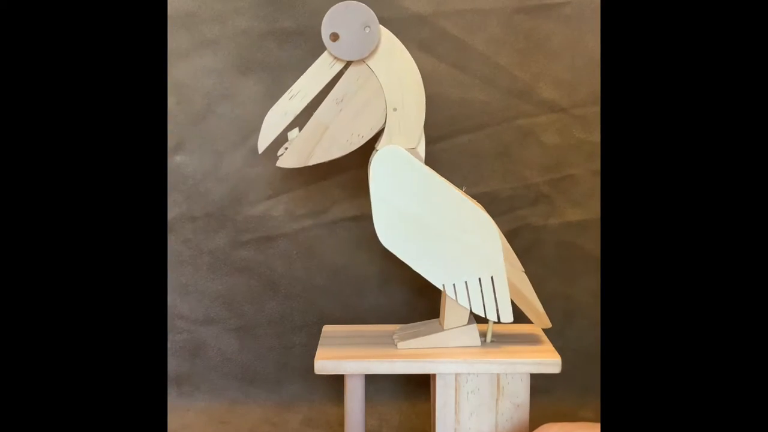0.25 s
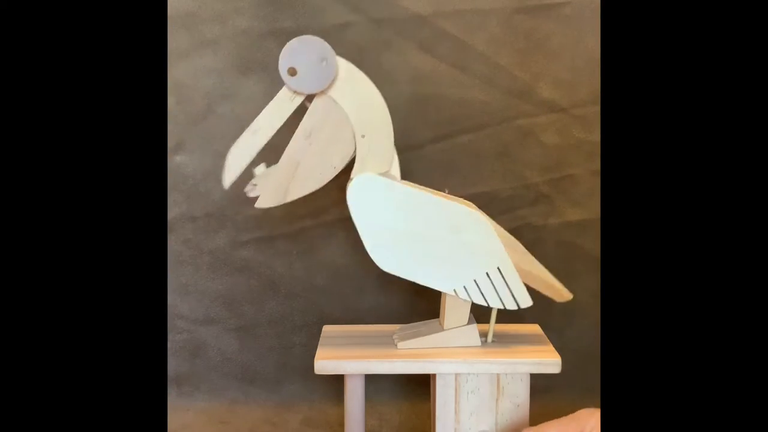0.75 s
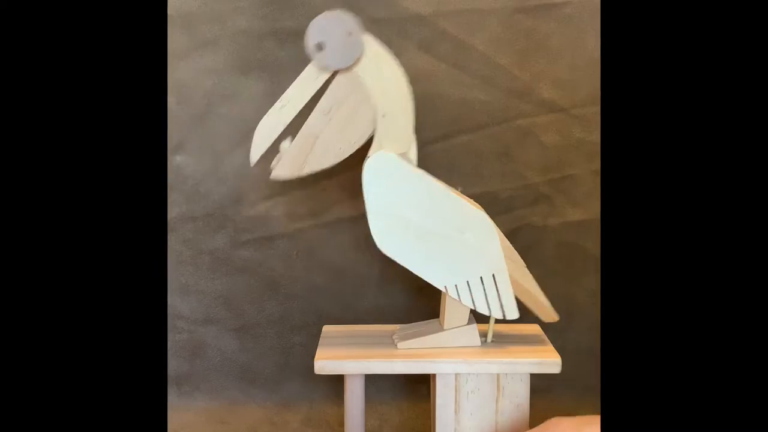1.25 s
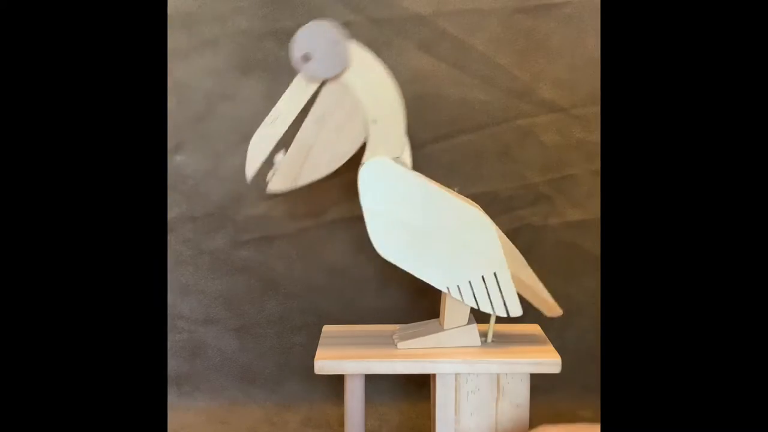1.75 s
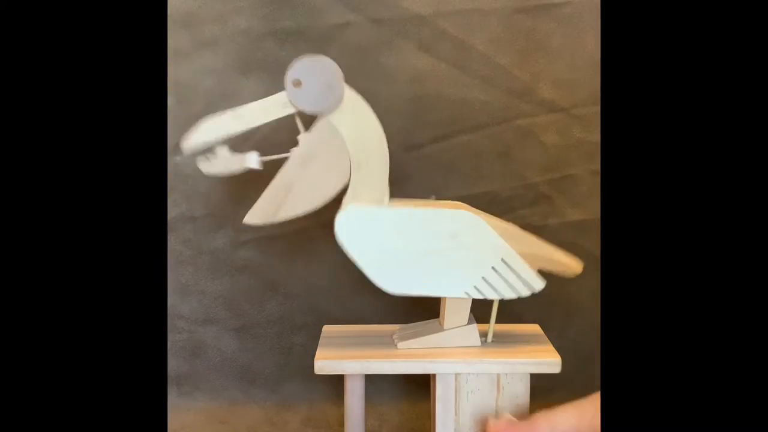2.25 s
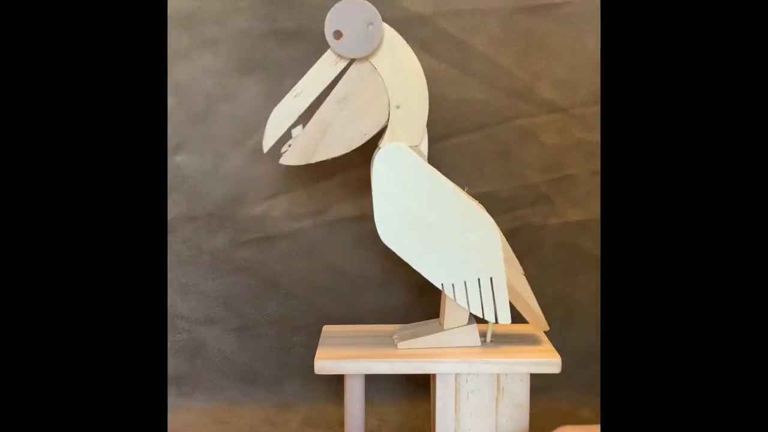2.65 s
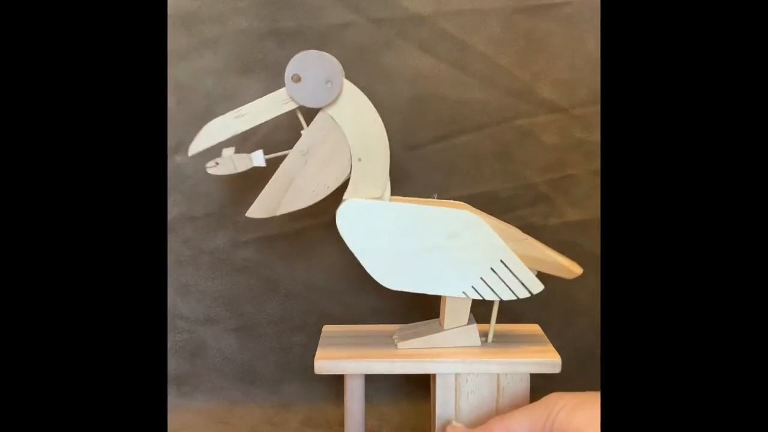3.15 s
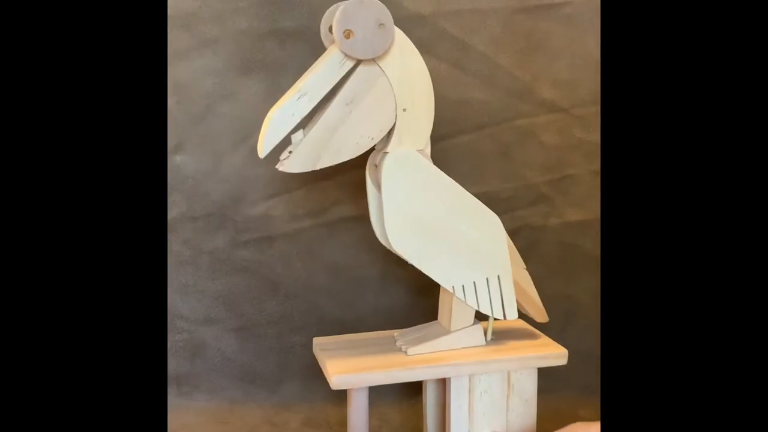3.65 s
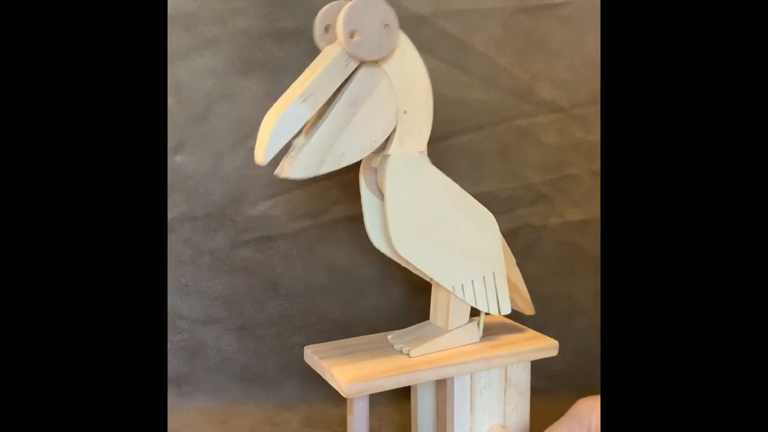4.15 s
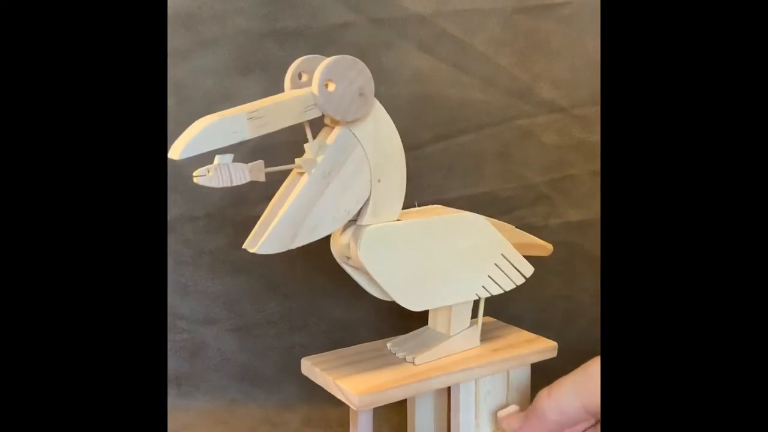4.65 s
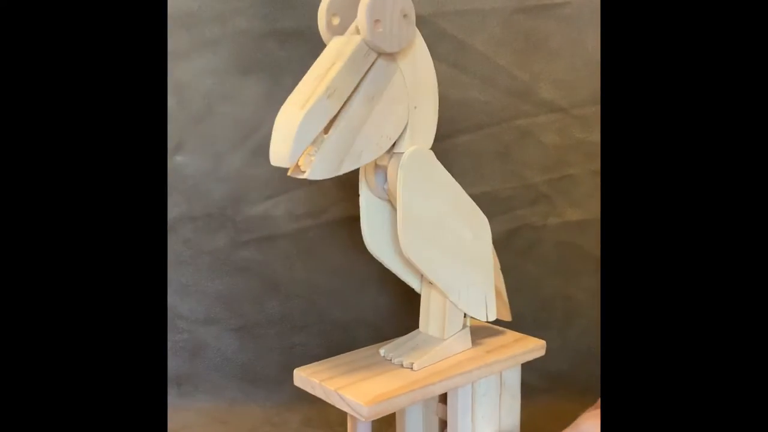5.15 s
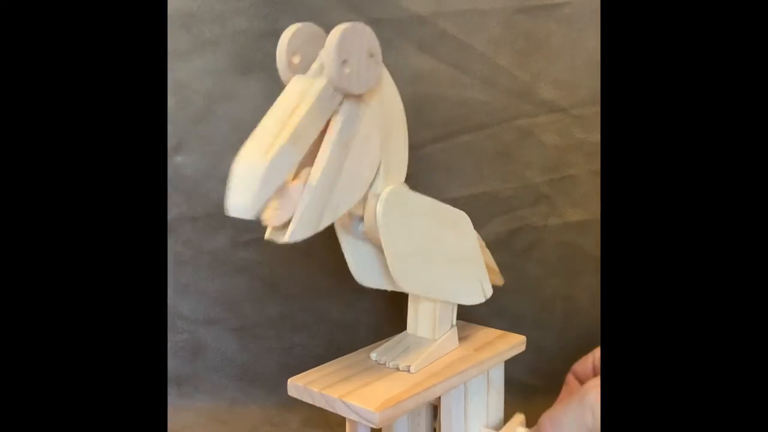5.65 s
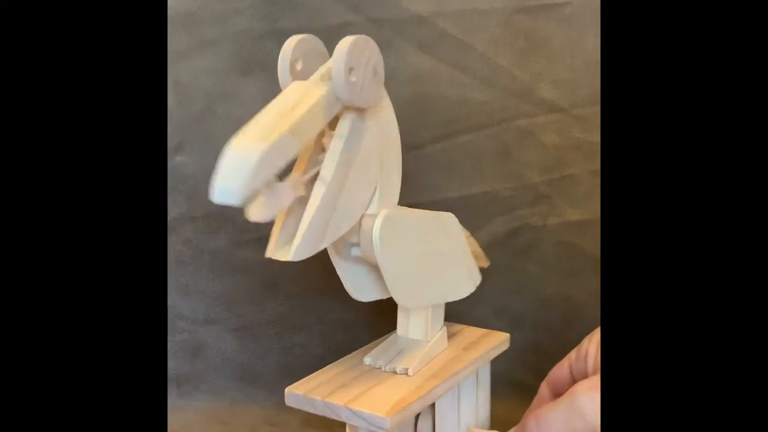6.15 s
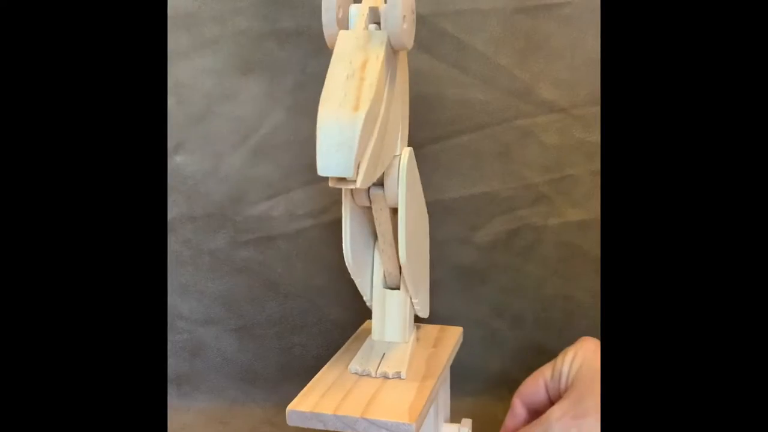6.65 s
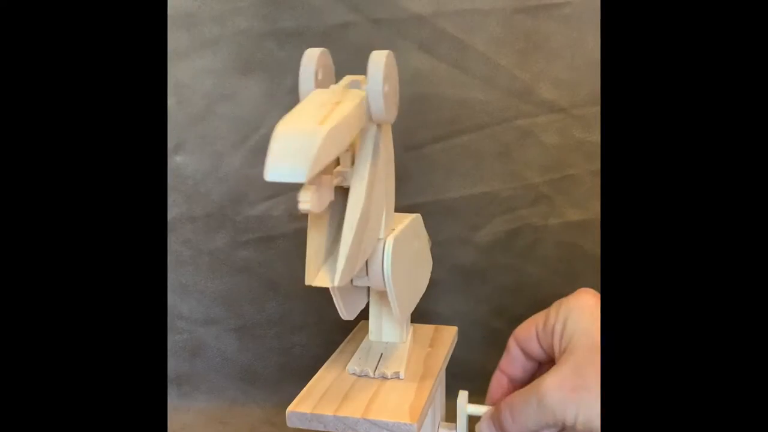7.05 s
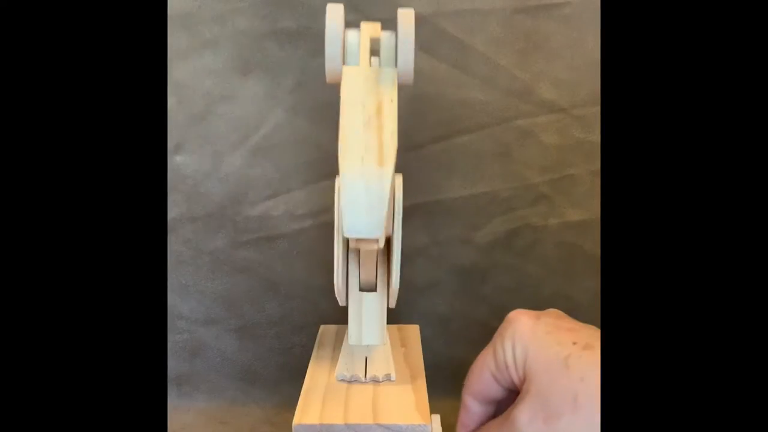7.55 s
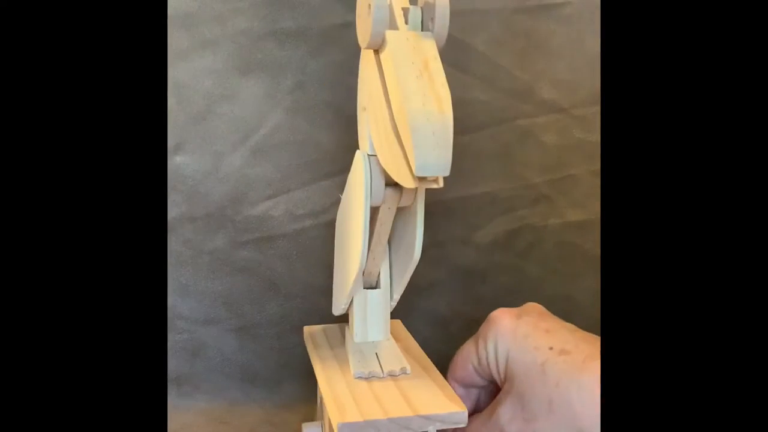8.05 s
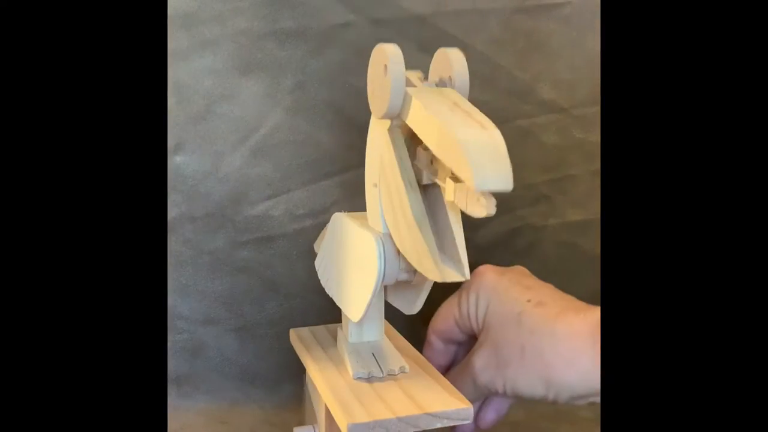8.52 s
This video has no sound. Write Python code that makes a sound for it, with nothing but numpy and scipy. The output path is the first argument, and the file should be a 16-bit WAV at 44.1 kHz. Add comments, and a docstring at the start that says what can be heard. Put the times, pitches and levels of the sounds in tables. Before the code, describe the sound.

A hand-cranked wooden toy bird clacks, knocks and creaks in uneven bursts, its beak snapping, close by in a small quiet room.

```python
"""A hand-cranked wooden pelican bows, snaps its beak and rears up again, close by in a small quiet room.
In still air the dry axle first ticks by stick-slip, and friction noise swells with each push of the crank.
From half a second on, a link rasps along its guide, then beak, wings and linkage clack as damped noise bursts
and followers knock on the hollow stand, whose modes ring on; loose parts rattle and a thin slat sings.
A second in, the beak starts to snap shut; from two seconds links also hit their stops. Short echoes follow."""
import sys
import numpy as np
from scipy import signal
from scipy.fft import rfft, irfft, next_fast_len
from scipy.io import wavfile
from scipy.ndimage import map_coordinates

SR = 44100
rng = np.random.default_rng(int(sys.argv[2]) if len(sys.argv) > 2 else 0)


def transcribe(u):
    """Save the signal u as a 16-bit wav file named by the first command-line argument.

    u: samples, shape (n,) or (channels, n), limited to [-1, 1]; the rate is SR.
    q: integer samples, one column per channel.
    """
    v = np.clip(np.atleast_2d(u).T, -1, 1)
    q = np.round(v * 32767).astype(np.int16)
    wavfile.write(sys.argv[1], SR, q)


N = 387198  # length in samples

# still air of the room: frequency_hz, relative_db
AIR_COLOUR = [(20, -5.5), (45, 3), (90, -3), (150, -7), (260, -4.5), (420, -17), (620, -17), (1050, -18.5),
              (1800, -33.5), (3000, -39), (4200, -42.5), (8000, -43), (16000, -37.5)]

# stick-slip runs of the dry axle: first_slip_s, last_slip_s (unused for a single slip), count, strength_db
SLIP_RUNS = [(.089, 0.12, 3, -66.5), (0.182, .25, 4, -64.5), (.28, 0.38, 3, -59.5), (.379, 0.5, 5, -60.5),
             (1.244, 1.244, 1, -53), (1.731, 1.797, 3, -57.5), (1.809, 1.873, 6, -59),
             (1.918, 1.918, 1, -53), (2.546, 2.594, 2, -52.5), (3.004, 2.8, 1, -60.5),
             (3.667, 3.816, 4, -56.5), (3.856, 3.993, 8, -58.5), (5.018, 5.052, 3, -55.5),
             (5.328, 3.5, 1, -52.5), (6.371, 6.371, 1, -55), (6.649, 6.1, 1, -59.5), (7.572, 7.3, 1, -58),
             (7.935, 8.045, 4, -58)]
# resonances of the axle: frequency_hz, width_hz, gain_db
AXLE_MODES = [(1290, 54, 3), (3000, 420, -9.5), (3860, 210, 3.5), (4400, 170, -3.5), (7410, 600, -38),
              (12100, 740, -2.5), (15260, 700, -4)]
# scatter of the slips, in time (greatest in the middle of a run) and in strength
SLIP_SCATTER_S, SLIP_SCATTER_DB = 0.0052, 0.4

# reverberation of the room: frequency_hz, t60_s
ROOM_DECAY = [(100, 0.85), (400, 0.61), (1500, 0.58), (4000, 0.74), (8000, 0.6), (15000, 1.7)]
# strength of the room's answer: frequency_hz, level_db
ROOM_LEVEL = [(100, 0.5), (400, -4.5), (1500, -3), (4000, -6.5), (8000, -5), (15000, -14)]

# pushes of the hand on the crank: start_s (half risen), end_s, axle_hiss_db, sliding_load_db
PUSHES = [(0.107, 0.517, -86, -70.5), (0.507, 0.828, -64, -51), (0.96, 1.072, -66.5, -50),
          (1.262, 1.73, -67.5, -51.5), (2.038, 2.456, -64, -49), (2.545, 3.05, -69.5, -61),
          (3.147, 3.38, -69, -84), (3.34, 3.497, -69.5, -57), (3.533, 4.008, -66.5, -66),
          (4.097, 4.293, -67.5, -58), (4.298, 4.423, -73.5, -70), (4.597, 4.738, -70.5, -60),
          (4.745, 5.07, -70, -56), (5.453, 5.896, -73, -58.5), (5.97, 6.5, -67, -64.5),
          (6.644, 6.783, -63.5, -44.5), (6.819, 7.015, -69, -53.5), (7.184, 7.375, -66, -68),
          (7.405, 7.79, -68, -73), (7.42, 7.571, -88, -55), (8.09, 8.443, -69, -55.5),
          (8.593, 8.67, -67, -52.5)]
# a push builds up, wavers and dies away
PUSH_RISE_S, PUSH_T60_S, PUSH_WAVER_DB = 0.045, 0.33, -0.2
# colour of the axle's friction hiss: frequency_hz, relative_db
HISS_COLOUR = [(1500, -32), (3200, -13), (4300, 6), (5200, -5), (6200, -4), (7400, -5.5), (8600, -11.5),
               (10500, -7.5), (12300, -2.5), (13800, -2.5), (14700, -5.5), (15500, -1.5), (16400, -7.5)]
# scrape of the thin parts against the load and against the hiss
SCRAPE_LOAD_DB, SCRAPE_HISS_DB = -10.5, -11

# strokes of a link along its guide, gathering speed: start_s, end_s, end_level_db
STROKES = [(0.496, 0.525, -52.5), (0.91, 1.05, -59), (1.23, 1.36, -56), (1.92, 1.97, -59),
           (2.14, 2.266, -51), (3.33, 3.4, -62), (4.7, 4.837, -71), (3.99, 4.08, -49.5),
           (6.637, 6.653, -51.5), (6.667, 6.785, -52), (6.957, 7.011, -53.5), (8.1, 8.158, -55.5)]

# clatter of beak, wings and links as the bird pitches forward:
# time_s, strength_db, hardness_db (snap over clack), favoured_hz
CLACKS = [(0.5274, -46, -16, 1950), (0.5547, -40.5, -17, 3460), (.599, -44, -18.5, 1770),
          (.682, -40.5, -10.5, 3350), (0.77, -48, -8.5, 1430), (.7895, -44, -9.5, 4100),
          (.7972, -44, -10.5, 1780), (1.198, -59, -15, 1956), (1.3215, -44.5, -23.5, 3500),
          (1.3632, -45.5, -22.5, 1767), (1.3938, -38.5, 0, 5340), (1.425, -24.5, -10, 3500),
          (1.427, -33, -10.5, 1800), (1.4962, -48.5, -11, 1000), (1.9754, -34, -16, 1860),
          (1.9972, -37, -12.5, 2107), (2.2153, -49, -12, 2000), (2.2264, -43.5, 0.5, 5700),
          (2.282, -53.5, -40.5, 1560), (2.6769, -40.5, -19, 1780), (2.681, -35, 1, 2700),
          (2.7479, -44, -16.5, 2600), (2.7783, -39.5, -9, 1880), (2.8224, -33.5, -21.5, 3630),
          (2.8407, -41.5, -21.5, 1860), (4.0678, -33, 1, 2900), (4.0829, -43.5, -10, 1550),
          (4.0954, -35, -11.5, 1860), (4.2647, -50.5, -30, 2940), (4.277, -57, -21, 3520),
          (4.3315, -38.5, -26, 3900), (4.4092, -55, -29.5, 2850), (4.425, -54.5, -24, 3500),
          (4.458, -62.5, -20, 1300), (5.3946, -51, -9.5, 4460), (5.4126, -27, -0.5, 5100),
          (5.507, -38, -6, 7460), (5.5348, -43.5, -8.5, 2653), (5.5816, -37.5, -6, 7440),
          (5.6544, -35.5, -17, 3700), (5.7808, -55, -11, 2100), (5.8718, -56, -12, 4060),
          (6.6645, -57.5, -4, 994), (6.724, -60, -5, 1010), (6.758, -59.5, -1, 3500),
          (6.773, -51.5, -26, 1350), (6.865, -63.5, -16, 2020), (7.5368, -59.5, -15, 1010),
          (8.1604, -31.5, -8, 7050), (8.184, -36, -11.5, 1930), (8.241, -48, -8.5, 2980),
          (8.2609, -37, -5.5, 7300), (8.6342, -60, -6, 2700)]
# limits of the wood body, clack and snap bands: edge_hz
CLACK_EDGES = [520, 2300, 6000, 16000]
# resonances of beak, wings and links: frequency_hz, width_hz, gain_db
PART_MODES = [(670, 57, 0), (1020, 120, 4), (1367, 81, 9), (1485, 18, 9), (2089, 160, 3.5),
              (2580, 400, 0.5), (3696, 470, 2.5), (4335, 350, 1.5), (5414, 290, -2.5), (5940, 220, -2.5),
              (6130, 150, -13.5), (7426, 130, 1.5), (9760, 420, -11.5), (11920, 550, -9),
              (15300, 1200, -10)]
# wood body over clack strength: dB when SPOT_HZ is favoured, and dB lost for each octave higher
BODY_DB, BODY_DB_PER_OCTAVE, SPOT_HZ = 2.5, 5, 2500
# harder contacts have less body: dB lost for each dB of hardness above the usual
BODY_DB_PER_HARDNESS, USUAL_HARDNESS_DB = 0.18, -15.5

# drops of the followers on the cam: time_s, strength_db, favoured_hz
KNOCKS = [(0.5585, -45, 235), (0.5768, -37.5, 367), (0.602, -42.5, 223), (0.7581, -39.5, 247),
          (0.7683, -39.5, 370), (1.2125, -50.5, 232), (1.3736, -45, 224), (1.424, -26.5, 684),
          (1.7422, -48.5, 258), (2.214, -48, 410), (2.2797, -45.5, 436), (2.4441, -38, 226),
          (2.7512, -35.5, 203), (2.8006, -37.5, 500), (2.8218, -34, 222), (3.1185, -43.5, 172),
          (3.4381, -51, 400), (3.476, -50, 264), (3.8662, -49.5, 164), (4.0727, -40, 236),
          (4.0946, -44.5, 358), (4.1635, -42.5, 255), (4.9363, -50.5, 393), (5.0515, -52.5, 188),
          (5.48, -34, 407), (5.511, -44.5, 240), (5.6022, -46, 212), (5.652, -35, 614),
          (6.6587, -48.5, 199), (6.7292, -39.5, 190), (6.758, -38, 168), (6.7688, -39.5, 352),
          (6.8463, -47.5, 170), (7.5301, -45, 320), (8.1625, -40, 660), (8.192, -43, 223),
          (8.242, -38.5, 215), (8.2655, -55, 228), (8.668, -48, 600)]
# limits of the thud and knock bands: edge_hz
KNOCK_EDGES = [58, 300, 1500]
# resonances of the hollow stand: frequency_hz, width_hz, gain_db
STAND_MODES = [(87, 16, 3), (163.3, 37, -1.5), (220.5, 12, 4.5), (234.6, 10, 6), (320, 26, -6),
               (382, 18, 3.5), (440, 19, 6), (477, 13, 0.5), (596, 20, -0.5), (629, 29, -4), (775, 110, -3),
               (1280, 150, -9.5)]
# a low favoured resonance gives mostly thud: favoured_hz, thud_over_strength_db
THUD_SHARE = [(230, 0), (380, -6), (600, -16)]
# a high one gives mostly knock: favoured_hz, knock_over_strength_db
KNOCK_SHARE = [(200, -6), (380, -1), (600, -2.5)]
# shake of the stand by every clack: thud_db and knock_db over its strength, favoured_hz
CLACK_JOLT = (-17, -13, 228)

# every clack leaves the loose parts jostling: dB against the clack, decay
JOSTLE_DB, JOSTLE_T60_S = -15.5, 0.88
# they rattle in their joints: dB against the jostle, touches a second
RATTLE_DB, RATTLE_RATE = -8.5, 85

# blows that set a thin slat singing: time_s, strength_db
SLAT_BLOWS = [(0.553, -45.5), (2.683, -47.5), (4.27, -59), (4.411, -62), (5.414, -35), (5.508, -46),
              (8.185, -42), (8.265, -48)]
# modes of the slat: frequency_hz, mean_gain_db, t60_s
SLAT_MODES = [(2760, 7, 0.12), (2694, 5, 0.16), (2820, -2.5, 0.22), (1260, -30, .15)]

# the beak snaps shut as the bird rears up: time_s, strength_db
BEAK_SHUTS = [(1.0612, -36.5), (1.6673, -33.5), (2.4267, -32), (3.4004, -38.5), (4.8985, -40),
              (6.2561, -40.5), (7.4716, -49)]
# sound of the beak: body_db, clack_db, snap_db over its strength, favoured_hz
BEAK_SOUND = (-14, 0.5, -9.5, 4151.5)
# jolt of the stand by the beak: thud_db, knock_db over its strength, favoured_hz
BEAK_JOLT = (-23.5, -15, 435)

# a link runs against its stop: time_s, strength_db, weight_db (thud over knock)
STOPS = [(2.0606, -37.5, -9), (2.183, -39.5, -4.5), (3.1161, -44.5, 2), (4.1429, -44, -2),
         (4.6347, -48.5, 2.5), (5.889, -44, -7), (6.306, -45, -2), (7.022, -42.5, -7)]
# the thin parts at a stop: body_db, clack_db, snap_db over its strength, favoured_hz
LINK_SOUND = (-1, -10, -17.5, 1100)
STOP_HZ = 556  # resonance of the stand that a stop favours

# likeness of the two ports for diffuse sound: frequency_hz, correlation
DIFFUSE_LIKENESS = [(60, .96), (130, .88), (290, .76), (640, .2), (1400, -.3), (3000, -.05), (15000, -.05)]
# likeness of the two ports for a blow: frequency_hz, correlation
DIRECT_LIKENESS = [(60, .97), (600, .9), (15000, 0.69)]
# a blow reaches the right port first: mean lead, and its scatter from blow to blow
PORT_LEAD_S, PORT_SCATTER_S = 0.000377, 0.00014
# colour of the ports: frequency_hz, left_minus_right_db
PORT_LEAN = [(60, -2), (250, -5.5), (600, -2), (1200, 0.5), (2300, -2.5), (4500, -2.5), (8000, -2.5),
             (13000, -4.5)]
TOP_HZ = 16200  # band limit


def amp(db):
    """Logarithmic level: decibels become an amplitude gain."""
    return 10 ** (np.asarray(db) / 20)


def unit(x):
    """Normalisation to an rms of 1."""
    return x / np.sqrt(np.mean(x ** 2) + 1e-30)


def along(points, hz):
    """Interpolation of (Hz, value) points on a logarithmic frequency axis."""
    f, v = np.transpose(points)
    return np.interp(np.log(hz + 1), np.log(f + 1), v)


def wobble(rate):
    """Slow random modulation: a smooth spline with rate knots a second."""
    knots = rng.standard_normal(int(N * rate / SR) + 4)
    return map_coordinates(knots, [np.arange(N) * rate / SR], order=2)


def filtered(x, response):
    """Linear filtering: the spectrum of x is multiplied by a frequency response."""
    n = x.shape[-1]
    m = next_fast_len(n + 2048)
    hz = np.fft.rfftfreq(m, 1 / SR)
    return irfft(rfft(x, m) * response(hz), m)[..., :n]


def resonances(modes, hz):
    """Modal response: damped resonators whose powers add, returned as a gain."""
    power = sum(
        amp(db) ** 2 * (hz * width) ** 2 / ((centre * centre - hz * hz) ** 2 + (hz * width) ** 2)
        for centre, width, db in modes)
    return np.sqrt(power)


def band(hz, lo, hi):
    """Band-pass gain with steep, smooth edges."""
    return 1 / np.sqrt((1 + (lo / (hz + 1)) ** 10) * (1 + (hz / hi) ** 10))


def noise(colour, size, count=1, likeness=DIFFUSE_LIKENESS, lead=0):
    """Partial coherence: coloured stereo noises (count, 2, size), the right port lead seconds early."""
    m = next_fast_len(size)
    hz = np.fft.rfftfreq(m, 1 / SR)
    # the correlation of mid + side and mid - side is the cosine of twice this angle
    turn = np.arccos(np.clip(along(likeness, hz), -1, 1)) / 2
    a, b = rfft(rng.standard_normal((2, count, m))) * colour(hz)
    mid, side = a * np.cos(turn), b * np.sin(turn)
    left, right = mid + side, mid - side
    if np.any(lead):
        right = right * np.exp(2j * np.pi * hz * lead)
    return irfft(np.stack([left, right], 1), m)[..., :size]


def add(track, s, sound):
    """Superposition: a sound is summed into the track from time s on."""
    start = max(0, round(s * SR))
    part = track[:, start:start + sound.shape[1]]
    part += sound[:, :part.shape[1]]


def grains(rate, life, spread_db):
    """Poisson-like impulses: random catches, rate a second, each decaying by a factor e in life seconds."""
    strength = amp(spread_db * np.clip(rng.standard_normal(N), -2, 2))
    catches = (rng.random(N) < rate / SR) * strength
    return unit(signal.lfilter([1], [1, -np.exp(-1 / (life * SR))], catches))


def swells(starts, ends, levels_db, rise, t60):
    """Energy addition: gain of motions that build up, hold until their end and decay exponentially."""
    t = np.arange(0, N, 64) / SR  # coarse time steps
    starts, ends, levels_db = np.array([starts, ends, levels_db])[..., None]
    build = np.clip((t - starts) / rise + .5, 0, 1)  # half way up at the start time
    each = build * amp(levels_db - 60 * np.maximum(t - ends, 0) / t60)
    return np.interp(np.arange(N) / SR, t, np.linalg.norm(each, axis=0))


def blows(times, levels_db, colour, attack, t60, span, graze_db):
    """Impact: parts graze, seat and decay; before scaling in, the energy is that of the level over span s."""
    lead = .012  # the graze begins this many seconds ahead
    t = np.arange(SR // 8) / SR - lead
    after = np.maximum(t, 0)
    shape = (1 - np.exp(-after / attack)) * amp(-60 * after / t60)
    graze = amp(graze_db) * np.exp(-np.abs(t) / 0.0043)
    shape = shape / shape.max() + graze
    track = np.zeros((2, N))
    port_lead = PORT_LEAD_S + PORT_SCATTER_S * rng.standard_normal((len(times), 1))
    rings = noise(colour, size=len(t), count=len(times), likeness=DIRECT_LIKENESS, lead=port_lead)
    for s, db, ring in zip(times, levels_db, rings):
        add(track, s - lead, amp(db) * unit(ring * shape) * np.sqrt(span * SR / len(t)))
    return track


def struck(modes, edges, spot_hz, favour_db, octaves):
    """Selective excitation: the spot that is hit favours the resonances near spot_hz within one band."""
    def colour(hz):
        bump = np.exp(-(np.log2((hz + 1) / spot_hz[:, None]) / octaves) ** 2)
        return resonances(modes, hz) * band(hz, *edges) * amp(favour_db * bump)
    return colour


def ringing(x, modes, ring_db):
    """Free vibration: narrow modes (Hz, width Hz, dB) of a body sing on after the contact."""
    def sing(hz):
        return sum(
            amp(db) * 1j * hz * width / (centre * centre - hz * hz + 1j * hz * width)
            for centre, width, db in modes)
    return x + amp(ring_db) * filtered(x, sing)


def still_air():
    """Stationary random pressure: steady coloured noise of the quiet room."""
    return amp(-61.5) * unit(noise(lambda hz: amp(along(AIR_COLOUR, hz)), size=N)[0])


def slips():
    """Stick-slip friction: the dry axle lets go in runs of tiny bright ticks, not quite evenly spaced."""
    ticks = []
    for first, last, count, strength_db in SLIP_RUNS:
        place = np.linspace(0, 1, round(count))
        late, louder = rng.standard_normal((2, len(place)))
        scatter = SLIP_SCATTER_S * late * np.sin(np.pi * place)
        times = first + place * (last - first) + scatter
        ticks += zip(times, strength_db + SLIP_SCATTER_DB * louder)
    s, db = np.transpose(ticks)
    return blows(s, db - .5, lambda hz: resonances(AXLE_MODES, hz),
                 attack=0.0006, t60=0.03, span=0.0074, graze_db=-33.5)


def room(x):
    """Reverberation: walls answer each quarter second of the motion with a different decaying noise tail."""
    out = np.zeros((2, N))
    hop = SR // 4
    for start in range(0, N, hop):
        hz, t, z = signal.stft(noise(np.ones_like, size=SR // 2)[0], SR, nperseg=256)
        fade = amp(-60 * t / along(ROOM_DECAY, hz)[:, None]) * (1 - np.exp(-t / 0.0049))
        # near surfaces crowd the first few hundredths of a second
        fade *= 1 + 7.3 * np.exp(-t / 0.029)
        energy = np.mean(fade ** 2, 1, keepdims=True) * (SR // 2)
        fade *= amp(along(ROOM_LEVEL, hz))[:, None] / np.sqrt(energy)
        tail = signal.istft(z * fade, SR, nperseg=256)[1]
        add(out, start / SR, signal.fftconvolve(x[:, start:start + hop], tail, axes=1))
    return out


def jostling():
    """Exponential decay: gain of the loose parts' motion, started anew by every clack."""
    s, clack_db = np.transpose(CLACKS)[:2]
    return swells(s, s, clack_db + JOSTLE_DB, rise=.01, t60=JOSTLE_T60_S)


def rubbing():
    """Sliding friction: uneven grain over grain makes the stand rumble, the thin parts scrape and hiss."""
    start, end, hiss_db, load_db = np.transpose(PUSHES)
    waver = amp(PUSH_WAVER_DB * wobble(rate=14))
    turning = waver * swells(start, end, hiss_db, PUSH_RISE_S, PUSH_T60_S)
    load = waver * swells(start, end, load_db, PUSH_RISE_S, PUSH_T60_S)
    grip = grains(rate=330, life=0.0056, spread_db=5.5)
    # each noise is partly steady and partly follows the grip
    rumble = noise(lambda hz: resonances(STAND_MODES, hz) * band(hz, 45, 750), size=N)[0]
    rumble = unit(rumble * (4.2 + grip))
    scrape = noise(lambda hz: resonances(PART_MODES, hz) * band(hz, 650, 3100), size=N)[0]
    scrape = unit(scrape * (1.0 + grip))
    hiss = noise(lambda hz: amp(along(HISS_COLOUR, hz)), size=N)[0]
    hiss = unit(hiss * (1.5 + grip))
    rumble_gain = np.hypot(amp(-2.5) * load, jostling())
    scrape_gain = np.hypot(amp(SCRAPE_LOAD_DB) * load, amp(SCRAPE_HISS_DB) * turning)
    return rumble * rumble_gain + scrape * scrape_gain + hiss * turning


def strokes():
    """Velocity-dependent friction: a link rasps along its guide, swelling until it reaches its stop."""
    t = np.arange(N) / SR
    speed = sum(amp(db) * np.interp(t, [start, end, end + 0.013], [0, 1, 0]) for start, end, db in STROKES)
    rasp = noise(lambda hz: resonances(PART_MODES, hz) * band(hz, 750, 6200) / (1 + hz / 2500), size=N)[0]
    return speed * unit(rasp * (0.48 + grains(rate=160, life=0.0039, spread_db=1.5)))


def alike(events, sound):
    """Similarity: blows share band levels and a favoured Hz, and differ only in time and strength."""
    *levels, hz = sound
    return [(s, *(db + level for level in levels), hz) for s, db, *_ in events]


def contacts():
    """Contact hardness sets the spectrum: blows on thin parts as (s, body dB, clack dB, snap dB, Hz)."""
    clatter = []
    for s, db, hardness_db, hz in CLACKS:
        body_db = BODY_DB - BODY_DB_PER_OCTAVE * np.log2(hz / SPOT_HZ)
        body_db -= BODY_DB_PER_HARDNESS * (hardness_db - USUAL_HARDNESS_DB)
        clatter.append((s, db + body_db, db, db + hardness_db, hz))
    return clatter + alike(BEAK_SHUTS, BEAK_SOUND) + alike(STOPS, LINK_SOUND)


def clacks():
    """Impact of wood on wood: brief cracks in three bands, each a noise burst coloured by part modes."""
    s, body_db, clack_db, snap_db, spot_hz = np.transpose(contacts())

    def part(k):
        return struck(PART_MODES, CLACK_EDGES[k:k + 2], spot_hz, favour_db=9.5, octaves=0.25)

    body = blows(s, body_db - .5, part(0), attack=0.0026, t60=0.013, span=0.0058, graze_db=-7.0)
    clack = blows(s, clack_db - .3, part(1), attack=0.0066, t60=.015, span=0.0087, graze_db=-16.5)
    snap = blows(s, snap_db - .3, part(2), attack=0.0031, t60=0.015, span=0.0061, graze_db=-23)
    modes = [(1370, 22, -10.5), (1580, 8.9, -4), (2900, 7.2, -2.5), (4600, 10, -14.5)]
    return ringing(body + clack + snap, modes, ring_db=0.0)


def jolts():
    """Structure-borne transmission: every blow that reaches the stand as (s, thud dB, knock dB, Hz)."""
    drops = [(s, db + along(THUD_SHARE, hz), db + along(KNOCK_SHARE, hz), hz) for s, db, hz in KNOCKS]
    stops = [(s, db + weight, db, STOP_HZ) for s, db, weight in STOPS]
    return drops + stops + alike(CLACKS, CLACK_JOLT) + alike(BEAK_SHUTS, BEAK_JOLT)


def knocks():
    """Modal excitation: followers drop on the cam, other blows jolt it too, and the hollow stand answers."""
    s, thud_db, knock_db, spot_hz = np.transpose(jolts())

    def part(k):
        return struck(STAND_MODES, KNOCK_EDGES[k:k + 2], spot_hz, favour_db=8, octaves=0.28)

    thud = blows(s, thud_db - 4.5, part(0), attack=0.0058, t60=0.16, span=0.019, graze_db=-9)
    knock = blows(s, knock_db - 1.5, part(1), attack=0.00074, t60=0.048, span=0.017, graze_db=0)
    modes = [(88, 3.8, -2), (221.0, 26.0, -6), (305.0, 4.1, 3.0),
             (370, 13, 2.5), (427, 3.4, -6.5), (589.0, 89, -6.0)]
    return ringing(thud + knock, modes, ring_db=5.5)


def rattle():
    """Random micro-impacts: while they jostle, the loose parts touch lightly at random moments."""
    wood = noise(lambda hz: resonances(PART_MODES, hz) * band(hz, 520, 5100), size=N)[0]
    touches = grains(rate=RATTLE_RATE, life=0.006, spread_db=-5.5)
    return amp(RATTLE_DB) * jostling() * unit(wood * touches)


def slat():
    """Free modal decay: a thin slat rings as damped sines, at new mode strengths after each blow."""
    t = np.arange(SR // 4) / SR
    hz, db, t60 = np.transpose(SLAT_MODES)[..., None]
    track = np.zeros((2, N))
    for s, strength_db in SLAT_BLOWS:
        # drawn apart for each port and mode
        size, phase = rng.standard_normal((2, 2, len(SLAT_MODES), 1))
        decay = amp(strength_db + db + 2 * size - 60 * t / t60)
        modes = decay * np.sin(2 * np.pi * hz * t + phase)
        add(track, s, modes.sum(1) * (1 - np.exp(-t / 0.0068)))
    return track


def scene():
    """Superposition of the toy, its echo and the still air of the room."""
    toy = clacks() + knocks() + slips() + strokes()
    return toy + room(toy) + slat() + rattle() + rubbing() + still_air()


def record(dry):
    """Transducer response: two microphone ports differ in colour; nothing is kept above the band limit."""
    ports = filtered(dry, lambda hz: amp(np.outer([1, -1], along(PORT_LEAN, hz)) / 2))
    return filtered(ports, lambda hz: hz < TOP_HZ)


dry = scene()
out = record(dry)
transcribe(out)
```